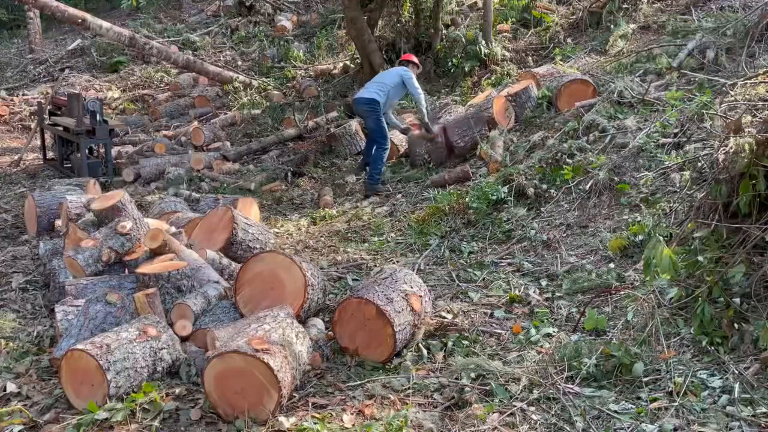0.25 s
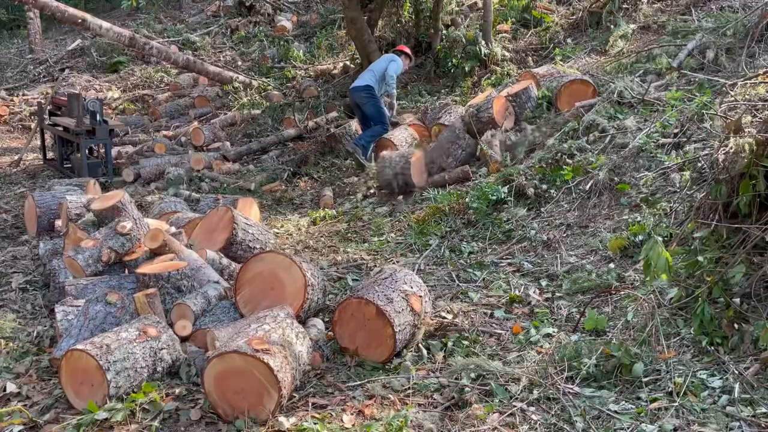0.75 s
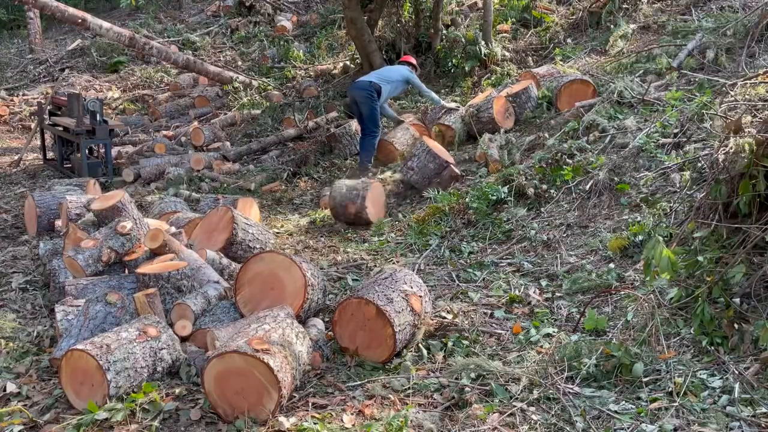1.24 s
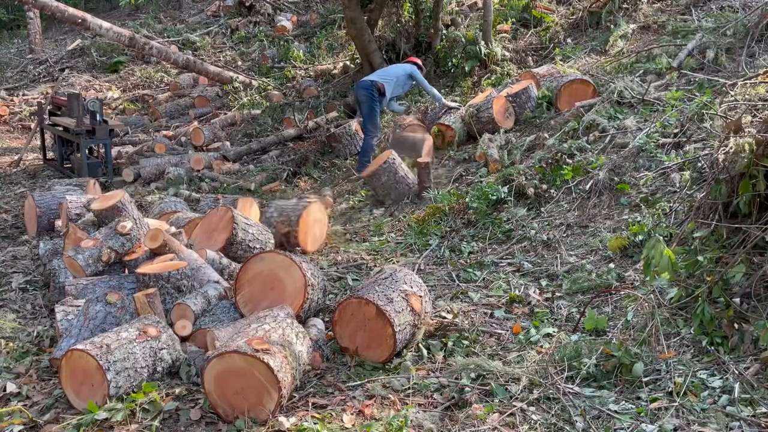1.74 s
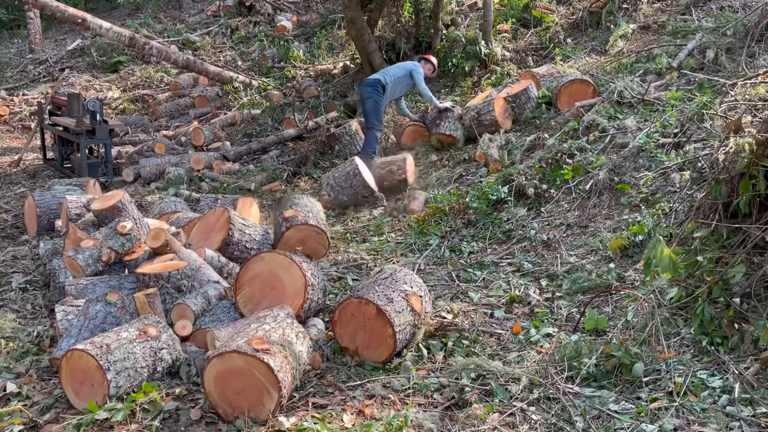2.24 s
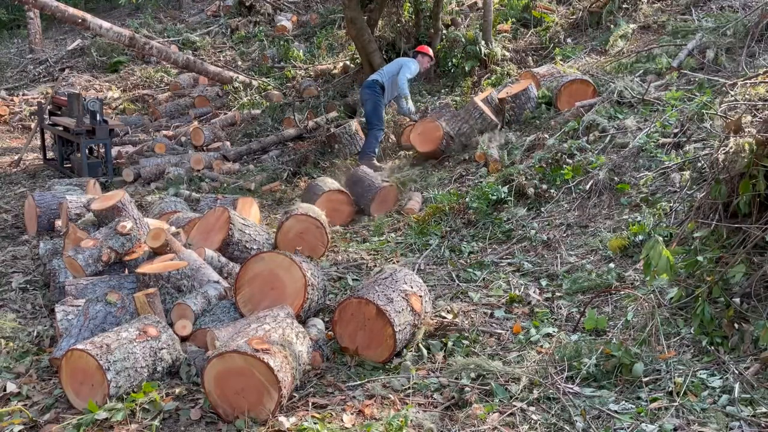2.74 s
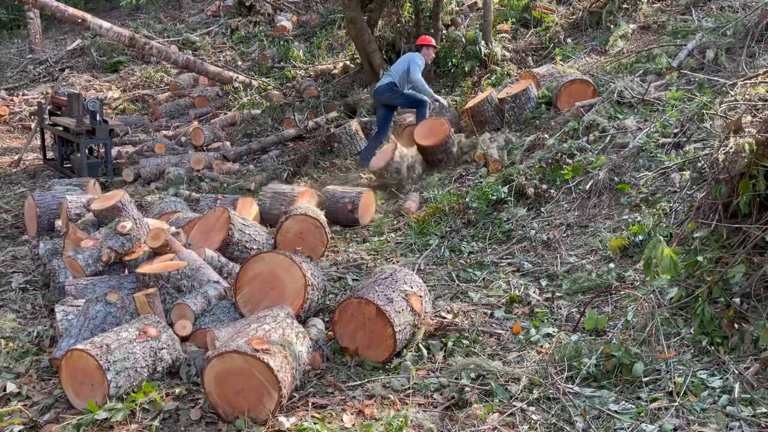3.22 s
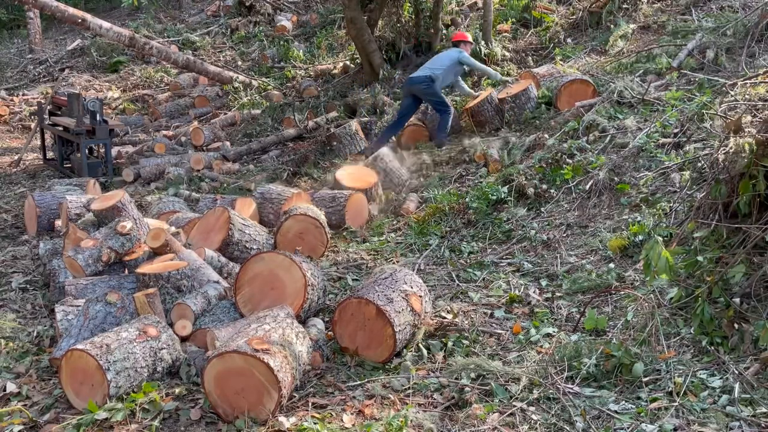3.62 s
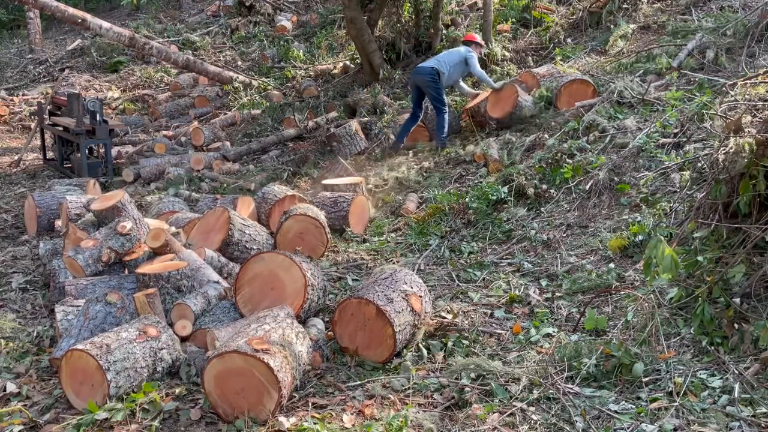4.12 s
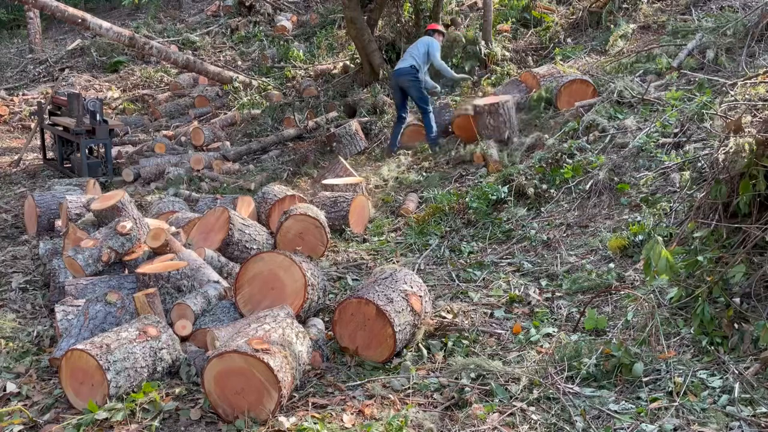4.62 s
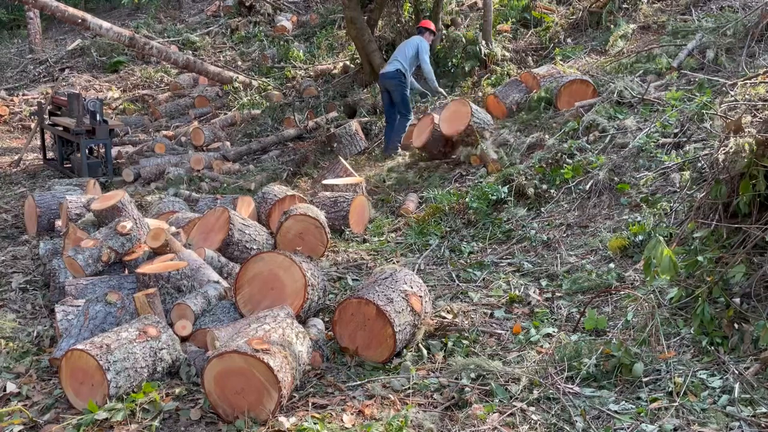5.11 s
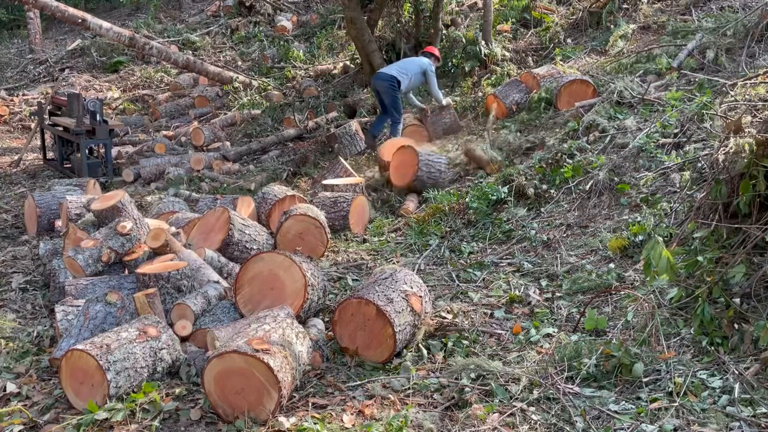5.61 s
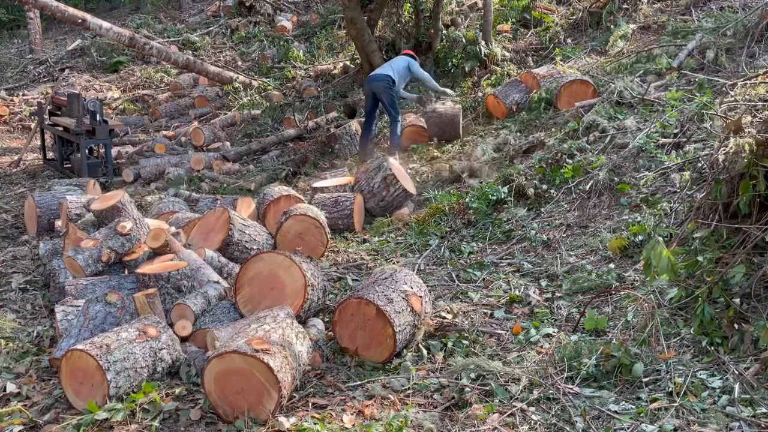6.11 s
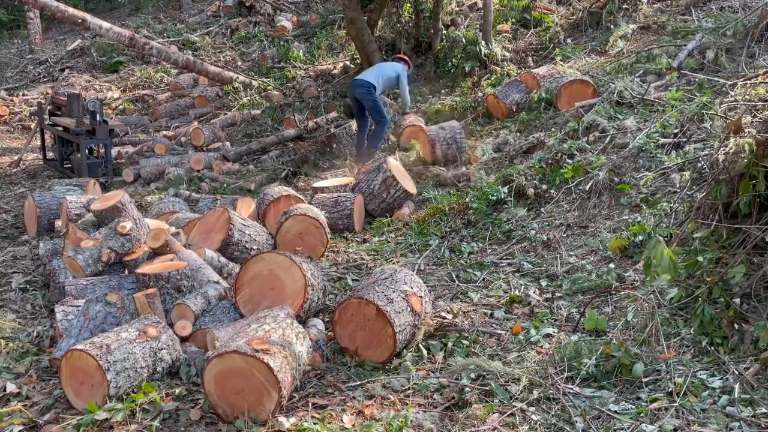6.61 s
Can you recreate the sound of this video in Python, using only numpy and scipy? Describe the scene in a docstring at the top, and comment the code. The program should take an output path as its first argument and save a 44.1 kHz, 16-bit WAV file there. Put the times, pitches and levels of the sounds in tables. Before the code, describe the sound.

Uneven bursts of leaf and bark crunching as cut logs roll downhill in woods, with sharp twig snaps, short knocks and soft ground thuds.

```python
"""Firewood rounds on a brushy slope

Heavy rounds pushed downhill in the woods, some way off, crush leaves and bark: grainy, coloured noise.
Twigs snap or tick (ringing noise bursts) and wood knocks (damped modes). Low thumps are falling sines:
rounds landing on soil and, in the higher ones, thick branches breaking.
Undergrowth scatters the hits (decaying-noise echoes); a small two-port microphone picks it all up."""
import sys
import numpy as np
from scipy import signal
from scipy.fft import rfft, irfft, next_fast_len
from scipy.io import wavfile
from scipy.ndimage import uniform_filter1d

SR = 44100
rng = np.random.default_rng(int(sys.argv[2]) if len(sys.argv) > 2 else 0)


def bounce(signal):
    """Save signal as a 16-bit WAV file at the path given by the first command-line argument."""
    frames = np.transpose(np.atleast_2d(signal))
    limited = np.clip(frames, -1, 1)
    pcm = np.round(limited * 32767).astype(np.int16)
    wavfile.write(sys.argv[1], SR, pcm)


N = 302217
TIME = np.arange(N) / SR

# relative noise spectra of litter and ground: [f/Hz, level/dB]
LEAF_SPECTRUM = [(700, -54), (2000, -0.5), (3300, -12.5), (4500, -2), (5400, -5), (6700, 3), (8000, 0),
                 (10000, -2.5), (12000, -9), (14000, -16.5), (16000, -26)]
BARK_SPECTRUM = [(500, -13.5), (650, -14.5), (800, 0.5), (1000, -3), (1200, 1), (1550, -0.5), (2300, 2.5),
                 (3200, -4.5), (4500, -2), (8000, -21.5)]
MULCH_SPECTRUM = [(100, 0), (200, -2.5), (350, 0), (550, -0.5), (750, 0.5), (1300, -21.5)]
SOIL_SPECTRUM = [(20, -57), (40, -1), (60, 8), (110, 0), (200, -10), (350, -27.5), (700, -53), (2000, -51)]


def rolling():
    """A rolling round crushes leaves and bark and shakes the ground."""
    leaves_db, bark_db, soil_db = [litter_db(layer) for layer in range(3)]
    leaves = crackle(per_s=900, spread_db=4.2, hiss=.66, grain_s=.0014, own=.5, apart_db=-10)
    leaves = from_db(leaves_db + 1.0) * leaves
    bark = crackle(per_s=400, spread_db=3.5, hiss=.65, grain_s=.0025, own=.6, apart_db=-13)
    bark = from_db(bark_db - 0.84) * bark
    # damp mulch underneath follows ground and bark levels
    mulch_db = .65 * soil_db + 0.4 * bark_db - 2.0
    mulch = from_db(mulch_db) * spread_noise(apart_db=-13.5)
    soil = from_db(soil_db - 9.0) * spread_noise(apart_db=-12)
    litter = colour(leaves, LEAF_SPECTRUM) + colour(bark, BARK_SPECTRUM)
    return litter + colour(mulch, MULCH_SPECTRUM) + colour(soil, SOIL_SPECTRUM)


# a round bears down on the litter; relative levels:
# [t/s of full weight, leaf level/dB, bark level/dB, ground level/dB, swell time constant/s, settling/s]
CRUNCHES = [(0.392, -53.5, -49.5, -65.5, 0.039, 0.02), (0.623, -39.5, -39.5, -48, 0.0089, 0.047),
            (0.874, -37.5, -44.5, -48, 0.027, 0.045), (1.035, -45, -56, -68.0, 0.038, 0.037),
            (1.09, -46.5, -51, -70.5, 0.09, 0.042), (1.187, -42, -51, -51.5, 0.093, 0.049),
            (1.382, -38.5, -43, -45.5, 0.031, 0.029), (1.6, -41.5, -40, -61, 0.009, 0.018),
            (1.654, -41.5, -46.5, -64.5, 0.056, 0.048), (1.781, -40, -40.5, -63, 0.011, 0.044),
            (1.924, -53, -48.5, -53, 0.049, 0.041), (2.065, -42.5, -46.5, -53, 0.048, 0.019),
            (2.282, -41, -46, -55, 0.054, 0.053), (2.448, -43, -43.5, -48, 0.008, 0.028),
            (2.528, -37, -45.5, -51, 0.03, 0.044), (2.617, -42.5, -45, -58, 0.022, 0.11),
            (2.749, -38.5, -48, -69.5, 0.006, 0.015), (2.805, -41, -39, -77, 0.007, 0.028),
            (2.895, -43.5, -47.5, -81, 0.211, 0.1), (3.047, -39, -49, -79.5, 0.004, 0.012),
            (3.106, -61, -41, -76, 0.009, 0.07), (3.267, -33, -40, -55, 0.022, 0.017),
            (3.299, -32.5, -39, -41.5, 0.0097, 0.033), (3.42, -46.5, -44, -57, 0.033, 0.015),
            (3.463, -38.5, -41.5, -56, 0.019, 0.067), (3.687, -36, -35.5, -45.5, 0.023, 0.035),
            (3.748, -54, -42.5, -51, 0.0085, 0.034), (3.835, -42.5, -47.0, -47.5, 0.071, 0.06),
            (4.101, -52.5, -59.5, -57, 0.19, 0.034), (4.249, -54.5, -57.5, -59.5, 0.022, 0.17),
            (4.432, -39, -40.5, -62, 0.0069, 0.037), (4.559, -37, -41.5, -46.5, 0.011, 0.028),
            (4.665, -40.5, -48, -46.5, 0.035, 0.066), (4.916, -38.5, -44.5, -50, 0.023, 0.03),
            (5.262, -32, -35.5, -44, 0.026, 0.025), (5.352, -35.0, -40.5, -51.0, 0.031, 0.031),
            (5.521, -40.5, -43.0, -64.5, 0.006, 0.03), (5.645, -37.5, -42, -44, 0.014, 0.042),
            (5.772, -43, -36.5, -36.5, 0.0053, 0.039), (5.879, -40.5, -44, -47, 0.042, 0.027),
            (5.929, -41.5, -48.5, -50, 0.043, 0.046), (6.048, -58, -54, -60, 0.011, 0.157),
            (6.246, -47.5, -48, -58.5, 0.061, 0.037), (6.45, -38.5, -45.0, -54, 0.03, 0.051),
            (6.633, -47, -49, -55.5, 0.17, 0.093), (6.787, -62, -60, -58, 0.018, 0.031)]
# steady rolling and sliding; relative levels: [t/s, leaf level/dB, bark level/dB, ground level/dB]
RUSTLE = [(0.04, -60, -61.0, -62.5), (0.55, -47.5, -54, -62), (0.78, -56.0, -62.0, -67),
          (1.0, -49.5, -57, -61), (1.5, -56, -61.5, -81), (1.7, -51.5, -64, -72), (2.15, -52.5, -56, -64),
          (2.6, -51.5, -52, -63), (3.1, -46.5, -57, -83), (3.6, -57, -59.5, -71), (4.2, -58.5, -61.5, -69),
          (4.8, -52.5, -59.5, -66.5), (5.06, -55.0, -56.5, -55), (5.6, -50.0, -58.5, -63),
          (6.1, -52.5, -58.0, -66), (6.34, -58.5, -74, -67.5), (6.55, -58, -58, -63),
          (6.85, -52.5, -62, -66)]


def litter_db(layer):
    """Layer level (0 leaves, 1 bark, 2 ground): crunches swell and settle on top of the rustle."""
    rustle = np.transpose(RUSTLE)
    t = TIME[::32]
    power = from_db(np.interp(t, rustle[0], rustle[1 + layer])) ** 2
    for full_s, *levels_db, swell_s, settle_s in CRUNCHES:
        envelope = np.exp(-np.maximum((full_s - t) / swell_s, (t - full_s) / settle_s))
        power = power + (from_db(levels_db[layer]) * envelope) ** 2
    return np.interp(TIME, t, 10 * np.log10(power))


def crackle(per_s, spread_db, hiss, grain_s, own, apart_db):
    """Fragments of every size: some cracks span all bands, others (share own) sound in one."""
    shared = grains(per_s, spread_db, hiss, grain_s)
    edges_hz = np.geomspace(350, 17000, 9)
    out = 0
    for low_hz, high_hz in zip(edges_hz, edges_hz[1:]):
        single = grains(per_s / 2, spread_db, hiss, grain_s)
        strength = np.sqrt((1 - own) * shared + own * single)
        band = signal.butter(2, [low_hz, high_hz], "band", fs=SR, output="sos")
        out = out + signal.sosfilt(band, strength * spread_noise(apart_db))
    return rms_one(out)


def grains(per_s, spread_db, hiss, grain_s):
    """Power of tiny fractures of uneven size over a smooth hiss; about 1 on average."""
    hits = rng.random(N) < per_s / SR
    sizes = from_db(spread_db * np.minimum(rng.exponential(1, N), 5)) * hits
    decay = np.exp(-2 / (grain_s * SR))
    power = signal.lfilter([1], [1, -decay], sizes ** 2 + 1e-18)
    power = power / (uniform_filter1d(power, size=2600) + 1e-9)  # level out slow changes
    return (power + hiss ** 2) / (1 + hiss ** 2)


def spread_noise(apart_db):
    """White noise from a wide patch of ground: mostly common to both ports."""
    mid, side = rng.standard_normal((2, N))
    return rms_one(mid + from_db(apart_db) * side * np.array([[1], [-1]]))


# twig breaks, from loud snaps to faint ticks:
# [t/s, relative crack level/dB, woody body level/dB re crack]
SNAPS = [(0.0765, -49.5, 7.5), (0.111, -44.5, -15), (0.1683, -39, -6), (0.1985, -42.5, -7),
         (0.3683, -34, -8), (0.3837, -34, -9), (0.5678, -38.5, 1), (0.618, -32.5, -16), (0.647, -35.5, 2),
         (0.6575, -27, -26), (0.861, -29.5, -11), (0.8846, -19.5, -12), (1.032, -39, -12),
         (1.0997, -39, 8.5), (1.2365, -43.5, 6.5), (1.3282, -23, -14), (1.3666, -26, -5), (1.381, -23, -37),
         (1.6445, -44.5, 11.5), (1.7806, -29.5, -15), (1.8784, -38.5, -3), (2.321, -21, -7.5),
         (2.432, -40, 7), (2.445, -37, 10.5), (2.456, -33, -18), (2.4626, -31, -17), (2.5185, -22, -27),
         (2.5956, -20.5, -7), (2.7514, -25, -25), (2.914, -23, -9.5), (3.2492, -23.5, -8),
         (3.2544, -16.5, -2.5), (3.2897, -15, -9.5), (3.3, -21, -2.5), (3.4478, -26.5, -7),
         (3.6598, -41, 13), (3.6815, -23.5, -1), (3.9104, -35.5, -11), (4.1183, -40, 0), (4.387, -38, -5),
         (4.4285, -26, 3.5), (4.433, -27.5, -25), (4.6615, -29.5, -24), (4.991, -46.5, 7),
         (5.18, -28.5, -4), (5.242, -24, -19), (5.262, -21, -25), (5.2759, -24.5, -0.5), (5.3254, -30, -18),
         (5.3634, -22, -7), (5.5153, -30.5, -5), (5.636, -28, -1.5), (5.669, -27.5, -1.5),
         (5.7597, -18, -7.5), (5.7843, -37, 12.5), (5.9219, -31.5, -24), (6.0127, -37, -17),
         (6.7204, -33.5, -4)]
# relative spectra of crack and woody body: [f/Hz, level/dB]
CRACK_SPECTRUM = [(1000, -32), (3200, -16.5), (4500, -4.5), (5400, -10), (6700, -1.5), (8200, 1.5),
                  (10300, -2.5), (12000, -10.5), (14000, -13), (16000, -26)]
BODY_SPECTRUM = [(150, -22.5), (450, -24), (900, -15.5), (1500, -11), (2400, -5.5), (3200, -12.5),
                 (4300, -10.5), (5500, -20.5), (9000, -72.5)]


def twigs():
    """Each break is a bright crack; thicker sticks add a woody body."""
    crack, body = np.zeros((2, N))
    thin = small_breaks(per_s=20, above_db=1, spread_db=2.2)
    for start_s, level_db, body_db in list(SNAPS) + thin:
        snap = stick(burst(rise_s=0.0002, decay_s=0.0014), 4130, 7300)
        add(crack, start_s, from_db(level_db + 20.5) * snap)
        wood = stick(burst(rise_s=0.00033, decay_s=0.0022), 1500, 3700, ring_db=-5.5)
        add(body, start_s, from_db(level_db + body_db + 19.0) * wood)
    return colour(crack, CRACK_SPECTRUM) + colour(body, BODY_SPECTRUM)


def small_breaks(per_s, above_db, spread_db):
    """Thin twigs break at random, their level following the crushed leaves; rows like SNAPS."""
    start_s = rng.uniform(0, N / SR, int(per_s * N / SR))
    leaves_db = np.interp(start_s, TIME, litter_db(0))
    size_db = spread_db * np.minimum(rng.exponential(1, len(start_s)), 3)
    body_db = rng.normal(-3.5, 3.9, len(start_s))
    return list(zip(start_s, leaves_db + above_db + size_db, body_db))


def stick(volley, low_hz, high_hz, ring_db=1, q=7):
    """Every stick rings briefly at a random pitch of its own; energy 1."""
    hz = low_hz * (high_hz / low_hz) ** rng.random()
    ring = signal.lfilter(*signal.iirpeak(hz, q, fs=SR), volley)
    sound = volley + from_db(ring_db) * ring
    return sound / np.linalg.norm(sound)


def burst(rise_s, decay_s):
    """Fibres give way in a quick irregular volley; energy 1."""
    t = TIME[:SR // 40]
    shape = (1 - np.exp(-t / rise_s)) * np.exp(-t / decay_s)
    volley = shape * rng.standard_normal(len(t))
    return volley / np.linalg.norm(volley)


# wood against wood: [t/s, relative level/dB, nominal main-mode f/Hz]
KNOCKS = [(0.616, -39, 1280), (0.657, -41, 740), (0.858, -40, 1136), (0.883, -38, 850), (1.366, -39, 663),
          (1.603, -45.5, 864), (1.876, -35.5, 1250), (1.925, -45, 860), (2.322, -39, 1210),
          (2.444, -31, 1430), (2.623, -45, 600), (2.754, -44.5, 706), (2.837, -45, 980), (2.914, -43, 800),
          (3.253, -36, 1156), (3.296, -34.5, 556), (3.355, -43, 1240), (3.658, -34.5, 1270),
          (3.683, -34, 1234), (3.706, -33, 810), (3.745, -37.5, 1120), (3.832, -40.5, 856),
          (3.91, -39.5, 860), (4.432, -23.5, 1235), (4.457, -40, 1330), (4.545, -40.5, 714),
          (4.659, -41.5, 1135), (5.178, -40.5, 1220), (5.259, -37.5, 1180), (5.343, -30, 1060),
          (5.36, -35.5, 1200), (5.785, -31.5, 815), (5.928, -46, 1140), (6.067, -37.5, 1155)]
# nominal modes of a round: [f ratio to main mode, relative level/dB, t60/s]
LOG_MODES = [(.63, -7, 0.037), (.9, -25, 0.047), (1.004, 6, 0.014), (1.099, -5, 0.0037), (1.42, 5, 0.0051),
             (1.95, 1, 0.0038), (2.3, -1.5, 0.011)]


def knocks(contact_s=0.0033, rattle_db=-4):
    """Bark-cushioned contact rings heavily damped wood modes; the bark rattles through them too."""
    out, t = np.zeros(N), TIME[:SR // 12]
    for start_s, level_db, pitch_hz in KNOCKS:
        rattle, sound = burst(rise_s=0.0011, decay_s=0.005), 0
        onset = 1 - np.exp(-(t / contact_s) ** 2)
        for ratio, mode_db, t60_s in LOG_MODES:
            hz = pitch_hz * ratio * (1 + rng.normal(0, 0.029))
            ring = np.sin(2 * np.pi * hz * t) * from_db(-60 * t / t60_s) * onset
            rough = signal.fftconvolve(ring, rattle)[:len(t)]
            mode = rms_one(ring) + from_db(rattle_db) * rms_one(rough)
            sound = sound + from_db(mode_db + rng.normal(0, 0.86)) * mode
        add(out, start_s, from_db(level_db - 11.5) * rms_one(sound))
    return out


# low thumps: rounds landing on soil and, in the higher ones, thick branches breaking:
# [t/s, peak level/dB, start f/Hz, final f/Hz]
THUMPS = [(1.883, -25.5, 194, 48), (1.913, -45, 110, 70), (2.326, -47.5, 200, 90), (2.453, -43, 167, 90),
          (2.596, -42, 408, 150), (3.253, -34.5, 474, 300), (3.669, -26, 143, 56), (3.7043, -34, 480, 120),
          (3.757, -28, 167, 99), (4.301, -50, 170, 70), (4.547, -30, 500, 230), (4.664, -39, 463, 100),
          (4.9985, -28, 222, 45), (5.179, -43, 385, 150), (5.263, -29.5, 490, 200), (5.768, -36, 163, 90),
          (5.801, -38.5, 190, 120)]
CONTACT_CYCLES = 0.63  # time to full force, in cycles of the start pitch


def thumps(fall_s=0.0073):
    """A landing round or, higher up, a breaking thick branch: a few cycles that fall in pitch."""
    out, t = np.zeros(N), TIME[:SR // 10]
    for start_s, level_db, start_hz, end_hz in THUMPS:
        contact_s = CONTACT_CYCLES / start_hz
        hz = end_hz + (start_hz - end_hz) * np.exp(-t / fall_s)
        push = t / contact_s * np.exp(1 - t / contact_s)
        add(out, start_s, -from_db(level_db) * push * np.sin(2 * np.pi * np.cumsum(hz) / SR))
    return out


def woods(x, near_db=-10, near_t60_s=0.036, far_db=-18, far_t60_s=1.0, low_hz=750):
    """Near brush and farther trunks scatter the short waves, differently for each port."""
    t = TIME[:SR // 2]
    echoes = 0
    for level_db, t60_s in ((near_db, near_t60_s), (far_db, far_t60_s)):
        tail = rng.standard_normal((2, len(t))) * from_db(-60 * t / t60_s)
        echoes = echoes + from_db(level_db) * tail / np.linalg.norm(tail, axis=1, keepdims=True)
    highpass = signal.butter(1, low_hz, "high", fs=SR, output="sos")
    echoes = signal.sosfilt(highpass, echoes)
    return x + signal.fftconvolve(x[None], echoes, axes=1)[:, :N]


def from_db(db):
    """Amplitude ratio of a level in dB."""
    return 10 ** (np.asarray(db) / 20)


def rms_one(x):
    """Scale to an RMS of 1."""
    return x / np.sqrt(np.mean(x ** 2) + 1e-20)


def add(track, start_s, sound):
    """Mix a sound into a track at a given time."""
    at = max(round(start_s * SR), 0)
    track[at:at + len(sound)] += sound[:max(N - at, 0)]


def colour(x, spectrum):
    """Shape a white signal's spectrum, keeping its power; minimum phase keeps attacks sharp."""
    size = 2 * next_fast_len(N // 2 + 2048)
    hz, level_db = np.transpose(spectrum)
    bins_hz = np.maximum(np.fft.rfftfreq(size, 1 / SR), 1)
    gain = from_db(np.interp(np.log(bins_hz), np.log(hz), level_db))
    gain = rms_one(gain * np.minimum(bins_hz / hz[0], 1) ** 2)  # 12 dB/octave below the first point
    cepstrum = irfft(np.log(gain))[:size // 2]
    response = np.exp(2 * rfft(cepstrum, size) - cepstrum[0])
    return irfft(rfft(x, size) * response, size)[..., :N]


def scene():
    """The rustle is already diffuse; the single hits echo from the undergrowth."""
    return rolling() + woods(twigs() + knocks() + thumps())


# two microphone ports: [f/Hz, left minus right level/dB, left lead/rad]
PORTS = [(100, -0.5, 0.1), (1000, -0.3, -0.0), (1230, -0.3, -0.3), (1400, 6.6, 2.8), (1600, 0.0, 2.8),
         (2300, 3.7, 1.7), (3000, 10.3, 1.1), (3500, 7.7, 2.1), (4600, 9.9, 1.4), (5200, 7.3, 2.4),
         (5900, -5.6, 2.3), (7000, -2.4, 1.0), (9000, -0.7, 3.9), (11000, -0.4, 6.6), (14300, 0.1, 12.2),
         (16000, 2.3, 13.7)]
CUTOFF_HZ, FADE_IN_S = 16400, 0.038


def record(dry):
    """Ports differ in level and phase by frequency; the sound fades in and the top is cut."""
    size = next_fast_len(N + 4096)
    hz, *columns = np.transpose(PORTS)
    bins_hz = np.fft.rfftfreq(size, 1 / SR)
    balance_db, lead_rad = [np.interp(bins_hz, hz, column) for column in columns]
    ratio = from_db(balance_db)
    # the two ports' summed power gain stays constant
    ports = np.array([ratio, np.exp(-1j * lead_rad)]) * np.sqrt(2 / (1 + ratio ** 2))
    heard = irfft(rfft(dry, size) * ports, size)[:, :N]
    heard = heard * np.minimum(TIME / FADE_IN_S, 1) ** 4
    lowpass = signal.ellip(10, .1, 80, CUTOFF_HZ, fs=SR, output="sos")
    return signal.sosfilt(lowpass, heard)


dry = scene()
out = record(dry)
bounce(out)
```